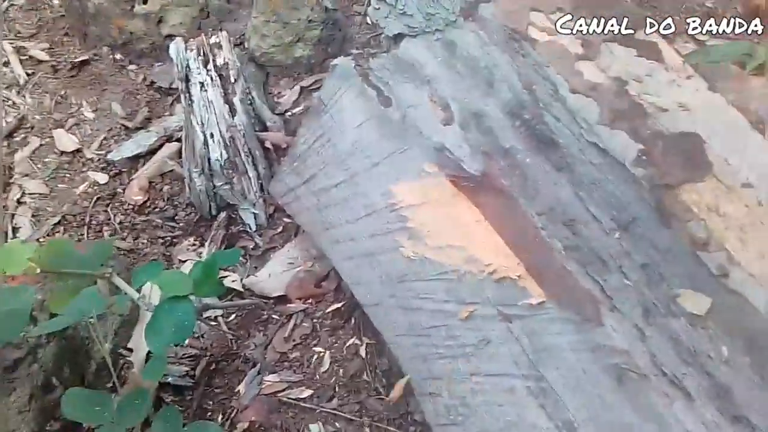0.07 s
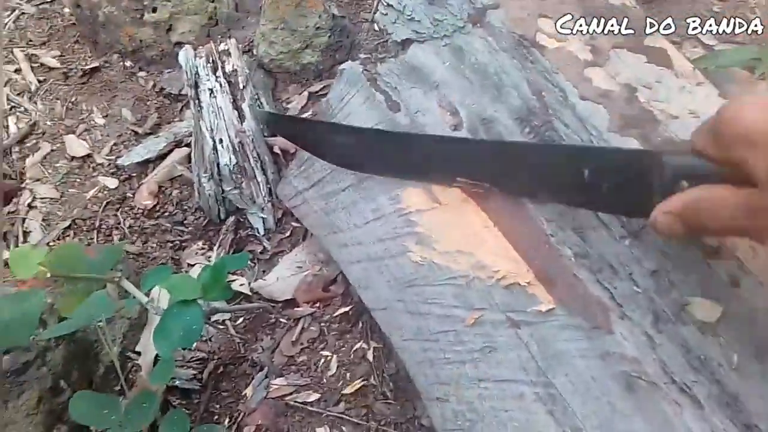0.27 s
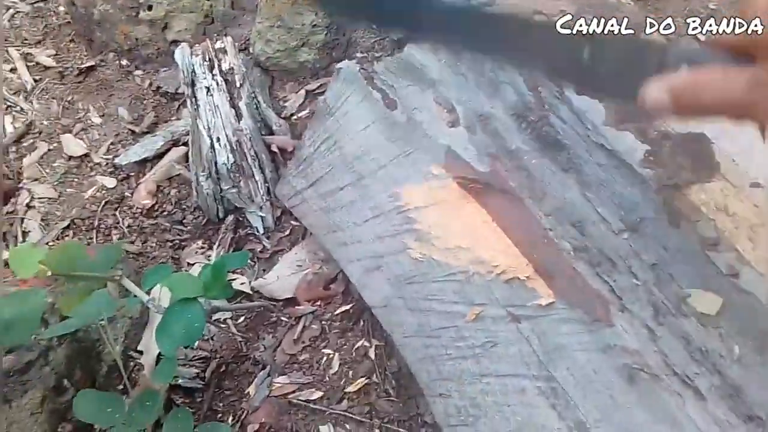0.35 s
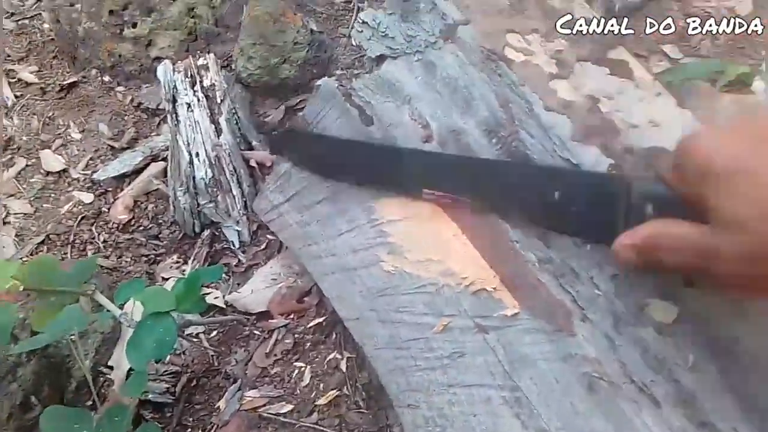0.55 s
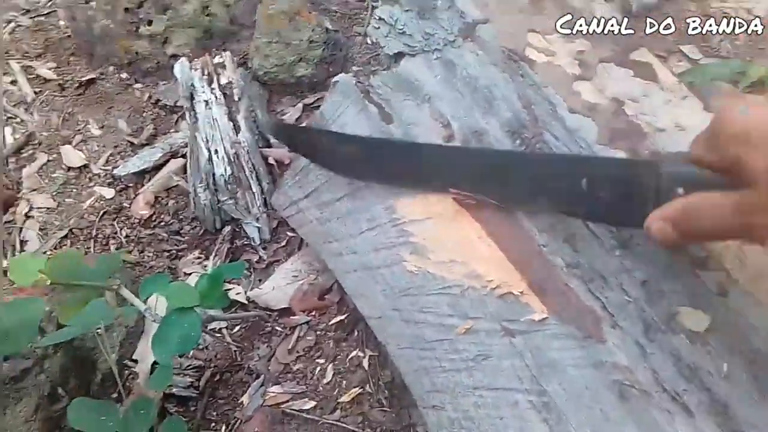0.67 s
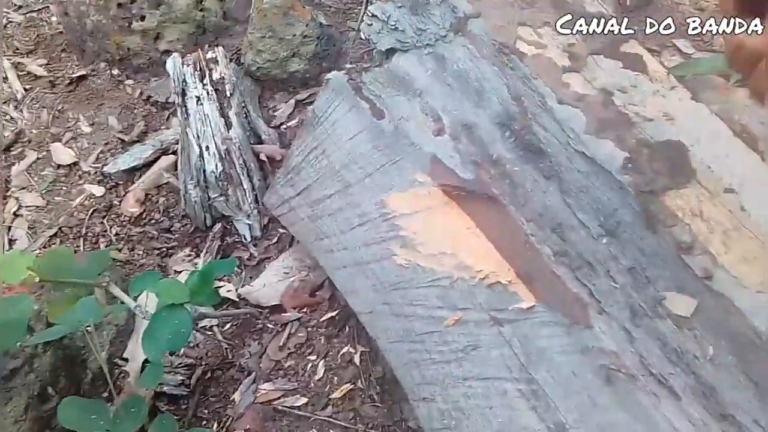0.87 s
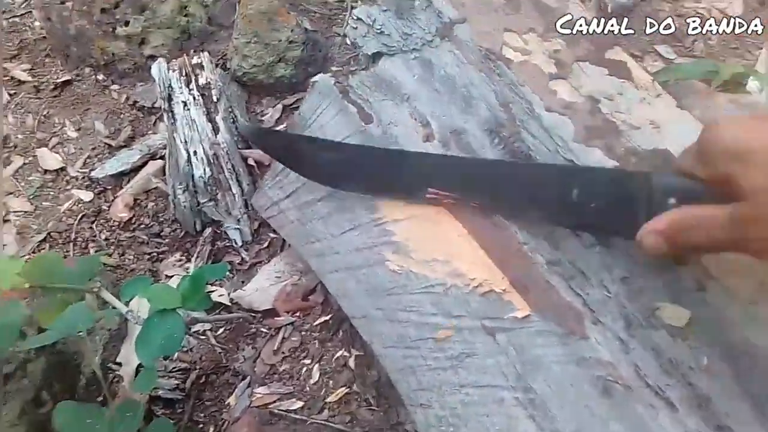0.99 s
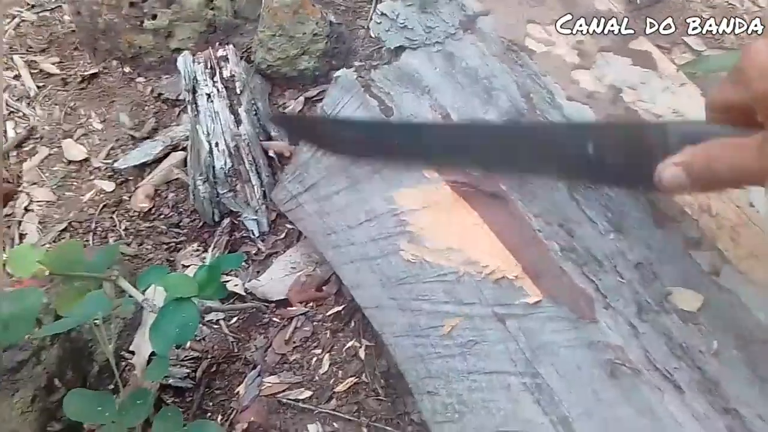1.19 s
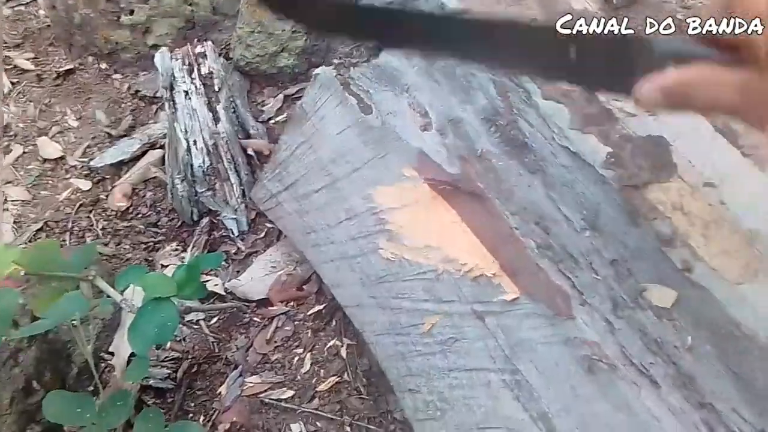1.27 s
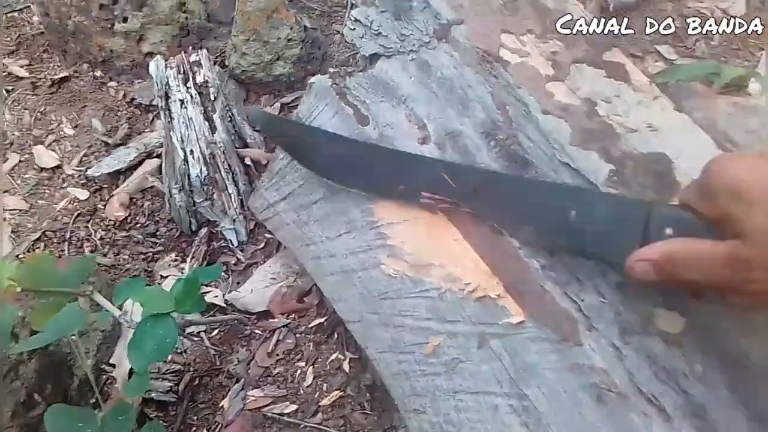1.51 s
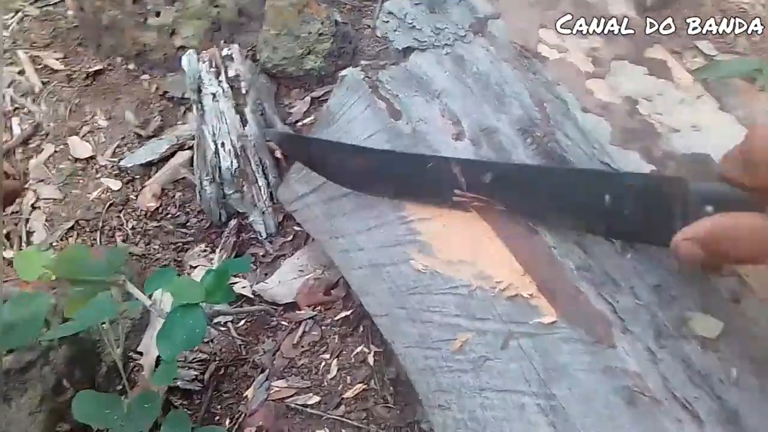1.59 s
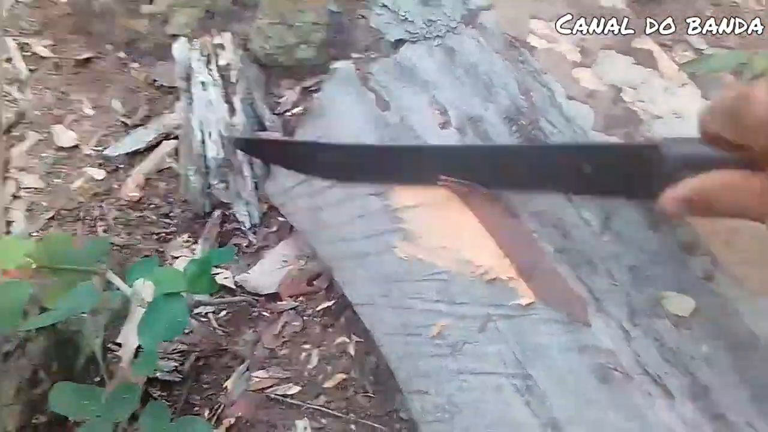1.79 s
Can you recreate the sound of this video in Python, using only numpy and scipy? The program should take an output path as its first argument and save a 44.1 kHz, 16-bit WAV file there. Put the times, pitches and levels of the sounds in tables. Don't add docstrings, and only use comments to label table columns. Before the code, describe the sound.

Machete blows strike a very hard log four times, close to the microphone, each a hard crack with a woody thud and metallic ring; small chips tick on leaves over a faint outdoor hum.

```python
import sys
import numpy as np
from scipy import signal
from scipy.io import wavfile

SR = 44100
rng = np.random.default_rng(int(sys.argv[2]) if len(sys.argv) > 2 else 0)


def log_audio(samples):
    frames = np.atleast_2d(samples).T
    limited = np.clip(frames, -1, 1)
    pcm = np.round(limited * 32767).astype(np.int16)
    wavfile.write(sys.argv[1], SR, pcm)


def natural_amplitude(level_db):
    exponent = np.asarray(level_db, float) / 20
    return 10 ** exponent


N = 81585


def at_hz(points, hz):
    points_hz, values = np.transpose(points)
    return np.interp(np.log(hz), np.log(points_hz), values)


def add(out, start_s, x):
    i = int(start_s * SR)
    out[i:i + len(x)] += x[:N - i]


def drift(rate_hz):
    knots = rng.standard_normal(400)
    return np.interp(np.arange(N) / SR * rate_hz, np.arange(len(knots)), knots)


def filtered(x, order, hz, kind):
    return signal.sosfilt(signal.butter(order, hz, kind, fs=SR, output="sos"), x)


def random_phase_sine(hz, t):
    return np.sin(2 * np.pi * (hz * t + rng.random()))


def noise_bands():
    edges_hz = 20 * 2 ** np.arange(0, 10.1, .5)
    white = rng.standard_normal((2, N))
    bands = []
    for k, (low_hz, high_hz) in enumerate(zip(edges_hz, edges_hz[1:])):
        bands.append((np.sqrt(low_hz * high_hz), filtered(white[k % 2], 2, [low_hz, high_hz], "band")))
    return bands


# time in seconds, level in dB.
HUM_LEVEL = [(0.0, -62.5), (0.18, -63.5), (0.412, -61), (0.684, -62.5), (0.818, -64), (1.046, -63),
             (1.164, -59), (1.85, -60.5)]
# frequency in Hz, level in dB.
HUM_SPECTRUM = [(25, -15), (70, -8.5), (150, -5), (320, -1.23), (650, -10), (1500, -13), (6000, -19),
                (15500, -31.5)]


def hum():
    out = np.zeros(N)
    knot_s, knot_db = np.transpose(HUM_LEVEL)
    mean_db = knot_db.mean()
    swell_db = np.interp(np.arange(N) / SR, knot_s, knot_db) - mean_db
    together = drift(23)
    for hz, noise in noise_bands():
        follow = 1.2 if hz < 1800 else .7
        patchy_db = 0.34 * together + 1.5 * drift(26)
        out += natural_amplitude(at_hz(HUM_SPECTRUM, hz) + 16.5 + mean_db + follow * swell_db + patchy_db) * noise
    return out


# start in seconds, level in dB, brightness in dB per octave,
# near echoes in dB over the tail, share of the t60.
WASH_BLOWS = [
    (.236, -40, 0.6, 14, 1.06),
    (.649, -41, -0.77, 12.5, 0.99),
    (1.024, -47, -1.83, 19, 0.92),
    (1.583, -39, 0.77, 11, 1.085),
]
# frequency in Hz, level in dB.
WASH_SPECTRUM = [(60, -19), (200, -4.5), (450, -8), (1000, -19.5), (2200, -17), (4300, -13), (8000, -22.5),
                 (16000, -34.5)]
# frequency in Hz, t60 in seconds.
WASH_DECAY = [(100, .35), (500, 0.19), (4000, .34), (12000, 0.28)]


def wash():
    rise_s, early_t60_s = 0.0061, 0.049
    out, t, together = np.zeros(N), np.arange(N) / SR, drift(150)
    for hz, noise in noise_bands():
        env = np.zeros(N)
        for start_s, db, tilt_db, early_db, share in WASH_BLOWS:
            age = np.maximum(t - start_s, 0)
            tail = natural_amplitude(-60 * age / at_hz(WASH_DECAY, hz) / share)
            early = natural_amplitude(early_db - 60 * age / early_t60_s)
            env += natural_amplitude(db + tilt_db * np.log2(hz / 2000)) * np.minimum(age / rise_s, 1) * (tail + early)
        wobble_db = 3.5 * drift(140) + 1.6 * together
        out += natural_amplitude(at_hz(WASH_SPECTRUM, hz) + 20.5 + wobble_db) * env * noise
    return out


# frequency in Hz, level in dB re the wash, t60 in seconds.
RESIDUE_MODES = [(1560, -8, .16), (2260, -8, 0.14), (2600, -10, .12), (2910, -10.5, .15), (3190, -8, .14),
                 (3750, -8, .15), (4220, -8.5, .15), (4640, -12, 0.12), (5230, -16, .2), (5900, -18, .2),
                 (8050, -20, .2), (9930, -19.5, .13)]


def residue():
    out, t = np.zeros(N), np.arange(12000) / SR
    for start_s, db, tilt_db, *_ in WASH_BLOWS:
        for hz, mode_db, t60_s in RESIDUE_MODES:
            level_db = db + mode_db + tilt_db * np.log2(hz / 2000)
            wobble_db = 3 * rng.standard_normal() + 3.5 * drift(50)[:len(t)]
            add(out, start_s, natural_amplitude(level_db + wobble_db - 60 * t / t60_s) * random_phase_sine(hz, t))
    return out


# start in seconds, level in dB, length
# in seconds, low edge in Hz, high edge in Hz.
CHIP_LANDINGS = [(0.27, -43, 0.0045, 1800, 6000), (.3825, -52.5, 0.005, 780, 1050),
                 (.3825, -55, 0.0022, 1500, 7000), (0.393, -53.5, 0.002, 1200, 11000),
                 (.511, -61, 0.0014, 5010, 11000), (0.5453, -53, 0.0025, 1100, 4800),
                 (0.565, -59, 0.0028, 1530, 3900), (0.582, -63, 0.0023, 5000, 10000),
                 (0.6805, -46, 0.003, 1760, 6100), (0.8106, -58, 0.005, 700, 8000),
                 (1.109, -57.5, 0.0019, 1500, 9000), (1.216, -62, 0.0028, 2000, 9000),
                 (1.2584, -52, 0.0058, 2450, 5410), (1.2565, -58.5, 0.0059, 5540, 10500),
                 (1.267, -57.5, .005, 2500, 12000), (1.3293, -56.5, .002, 1455, 10000),
                 (1.4955, -58.5, 0.0027, 1206, 8980), (1.7612, -53, 0.004, 1300, 1900),
                 (1.0203, -28, .0006, 1500, 14000), (1.768, -58, .002, 500, 10040),
                 (1.18, -58, 0.004, 399, 1990)]


def chips():
    out, t = np.zeros(N), np.arange(2500) / SR
    for start_s, db, length_s, low_hz, high_hz in CHIP_LANDINGS:
        clicks = rng.standard_normal(len(t)) * rng.exponential(1, len(t))
        env = np.minimum(t / .0006, 1) * np.exp(-(t / length_s) ** 1.5)
        spray = filtered(clicks * env, 2, [low_hz, min(high_hz, 18000)], "band")
        rms = np.sqrt(np.sum(spray ** 2) / (length_s * SR))
        add(out, start_s, natural_amplitude(db) * spray / rms)
    return out


# time in seconds, level in dB.
SING_CURVES = [
    [(.243, -49), (.262, -54), (.29, -48.5), (.305, -52), (.32, -80), (.335, -69), (.385, -58), (.41, -73),
     (.46, -80)],
    [(.658, -58.5), (.7, -53.5), (.735, -58.5), (.772, -64), (.795, -85), (.82, -76.5), (.87, -79)],
    [(1.032, -62), (1.066, -74), (1.13, -87)],
    [(1.59, -50), (1.601, -39.5), (1.645, -39), (1.67, -53), (1.695, -67), (1.73, -70), (1.765, -78),
     (1.78, -95), (1.81, -71)],
]


def sing():
    out, t = np.zeros(N), np.arange(N) / SR
    pitch_hz = 7650 + 4 * drift(25)
    tone = np.sqrt(2) * np.sin(2 * np.pi * np.cumsum(pitch_hz) / SR)
    for curve in SING_CURVES:
        s, db = np.transpose(curve)
        knot_s = np.r_[s[0] - .008, s, s[-1] + .02]
        out += tone * natural_amplitude(np.interp(t, knot_s, np.r_[-100, db, -100]))
    return out


# start in seconds, frequency in Hz, level in dB, t60 in seconds.
STRAY_MODES = [(.236, 1403, -35.5, .13), (.237, 1622, -38, .25), (.24, 1180, -29, .04),
               (.25, 415, -31, .05), (.27, 2260, -41, .06), (.2413, 3800, -17, .015), (.235, 775, -26, .03),
               (.2345, 8900, -12, .01), (.244, 2600, -28, .04), (.648, 1394, -38, .1),
               (.649, 1590, -38, .2), (.648, 1000, -24, .02), (.65, 2090, -18, .03), (.648, 2620, -19, .02),
               (.648, 3190, -19, .02), (.648, 9800, -22, .02), (1.024, 1620, -48, .2),
               (1.023, 2256, -34, .05), (1.022, 3000, -16, .02), (1.581, 3800, -7.5, .016),
               (1.5815, 4540, -11.5, .016), (1.582, 2320, -17, .025), (1.5815, 5390, -19, .015),
               (1.583, 1480, -27, .05), (1.62, 1520, -44, .06), (1.582, 1215, -25, .035),
               (1.582, 1842, -28, .03), (1.585, 523, -25, .05), (1.59, 2000, -35, .05),
               (1.6, 445, -41, .15), (1.585, 1615, -46, .2), (1.582, 9900, -22, .025)]


def strays():
    out, t = np.zeros(N), np.arange(12000) / SR
    for start_s, hz, db, t60_s in STRAY_MODES:
        wobble_db = 2.2 * drift(60)[:len(t)]
        env = (1 - np.exp(-t / .0006)) * natural_amplitude(db - 60 * t / t60_s + wobble_db)
        add(out, start_s, env * random_phase_sine(hz, t))
    return out


# frequency in Hz, t60 in seconds.
FREE_MODES = [
    (1604.5, 0.075),
    (770, .17),
    (544, .15),
    (258, 0.062),
    (430, 0.062),
]
# start in seconds, three blade modes in dB, both log modes in dB.
RING_BLOWS = [
    (.2365, -5, -28.5, -42, -26),
    (.649, -14, -26, -34.5, -28.5),
    (1.024, -11.5, -33.5, -40.5, -32),
    (1.583, -18.5, -31.5, -33.5, -26),
]
RING_FREEDOM = [0.91, 0.85, 0.76, 0.9]


def rings():
    out, t = np.zeros(N), np.arange(12000) / SR
    for (start_s, *blade_db, log_db), share in zip(RING_BLOWS, RING_FREEDOM):
        for (hz, t60_s), db in zip(FREE_MODES, blade_db + [log_db, log_db]):
            env = (1 - np.exp(-t / 0.0005)) * natural_amplitude(-60 * t / t60_s / share)
            wobble = natural_amplitude(1.5 * drift(70)[:len(t)])
            add(out, start_s, natural_amplitude(db) * env * wobble * random_phase_sine(hz, t))
    return out


# middle in seconds, pitch in Hz, level in dB, half length in seconds.
LOG_THUDS = [(.2404, 289, -10.5, .0068), (.239, 510, -18, 0.0069), (.6514, 456.6, -6, 0.0053),
             (.652, 260, -15, .0055), (1.0248, 377, -4, 0.0039), (1.027, 220, -21, 0.0067),
             (1.586, 337.5, -12.5, 0.0057), (1.587, 230, -23, 0.0066), (0.62, 152, -56, 0.0089),
             (.836, 150, -47, 0.01), (1.2088, 200, -29.5, 0.0053), (1.794, 205, -29.5, 0.0056),
             (.41, 150, -49, 0.012), (.384, 330, -50, .007), (1.655, 195, -48, .015),
             (1.215, 95, -39, .014), (1.2075, 380, -46, .004), (1.792, 390, -46, .004),
             (1.802, 124, -39, 0.01), (.305, 360, -47.5, 0.0078), (0.87, 240, -63, .007)]


def thuds():
    out, t = np.zeros(N), np.arange(-1000, 1000) / SR
    for middle_s, hz, db, half_s in LOG_THUDS:
        bell = np.cos(np.pi / 2 * np.clip(t / half_s, -1, 1)) ** 1.8
        add(out, middle_s + t[0], natural_amplitude(db) * bell * np.sin(2 * np.pi * hz * t))
    return filtered(out, 2, 140, "high")


def ring(clicks, hz, t60_s):
    radius, w = natural_amplitude(-60 / (t60_s * SR)), 2 * np.pi * hz / SR
    return signal.lfilter([0, np.sin(w)], [1, -2 * radius * np.cos(w), radius ** 2], clicks + 1e-18)


BITE_TIMES = [.2338, .237, .2412, .6469, .6495, 1.0213, 1.5807, 1.5845]
# level in dB, length in seconds, brightness in dB per octave, favoured pitch in Hz.
BITE_SOUNDS = [
    (-3, .0023, 2.2, 3300),
    (-9.5, 0.0033, 0, 2300),
    (-10, 0.0015, 0.5, 3800),
    (-6, .002, 1.2, 4800),
    (-10, 0.0037, -2, 2100),
    (-9, .004, -1.5, 5200),
    (-3.5, 0.003, 1.4, 4300),
    (-17, 0.0045, 1.2, 3300),
]
# frequency in Hz, level in dB, t60 in seconds.
GRIPPED_MODES = [(950, -15, 0.0038), (2110, -9, 0.0073), (2290, -7, 0.011), (3000, -7.5, 0.022),
                 (3367, -3.5, 0.011), (3824, -2.7, .015), (4573, -5.5, 0.0068), (4800, -6, 0.0056),
                 (5300, -9, .01), (6850, -19, 0.0044), (8800, -7.5, 0.01), (9700, -14, .01),
                 (11600, -17, .008), (13000, -18.5, .007)]


def crunch():
    lead_s, fade_s, grains_per_s = .0008, .001, 4700
    grain_spread_db, mode_spread_db, crack_db, splinter_db = 2, 2, 6.5, -2.5
    favour_peak_db, favour_octaves = 6, .3
    out, t = np.zeros(N), np.arange(4000) / SR
    for start_s, (db, length_s, tilt_db, favoured_hz) in zip(BITE_TIMES, BITE_SOUNDS):
        env = np.clip((t / lead_s) ** 8, .04, 1) * np.exp(-np.maximum(t - length_s, 0) / fade_s)
        blade = np.zeros(len(t))
        for hz, mode_db, t60_s in GRIPPED_MODES:
            breaks = rng.random(len(t)) < grains_per_s / SR
            heights = natural_amplitude(grain_spread_db * rng.standard_normal(len(t)))
            grains = breaks * heights * rng.choice([-1, 1], len(t))
            grains[36] = natural_amplitude(crack_db)
            mode = ring(grains * env, hz, t60_s)
            octaves_off = np.log2(hz / favoured_hz)
            favour_db = favour_peak_db * np.exp(-(octaves_off / favour_octaves) ** 2)
            level_db = mode_db - 6 + tilt_db * np.log2(hz / 3000) + favour_db
            level_db += mode_spread_db * rng.standard_normal()
            blade += natural_amplitude(level_db) * mode / np.abs(mode).max()
        bare = signal.lfilter([1, -1], [1, -1.2, .4], rng.standard_normal(len(t))) * env
        add(out, start_s - lead_s, natural_amplitude(db) * (blade + natural_amplitude(splinter_db - 10 + tilt_db) * bare))
    return filtered(out, 4, 15300, "low")


def scene():
    yard = hum() + wash() + residue() + chips()
    blade = sing() + strays() + rings()
    return (yard + blade + thuds() + crunch())[None]


def roll_off(x):
    return signal.sosfilt(signal.butter(12, 16770, fs=SR, output="sos"), x)


def record(dry):
    ceiling, cutoff_hz = .72, 16900
    x = filtered(dry, 1, 60, "high")
    x = ceiling * np.tanh((np.abs(x) / ceiling) ** 2) ** .5 * np.sign(x)
    x = signal.sosfilt(signal.cheby2(12, 70, cutoff_hz, fs=SR, output="sos"), x)
    return roll_off(x)


dry = scene()
out = record(dry)
log_audio(out)
```